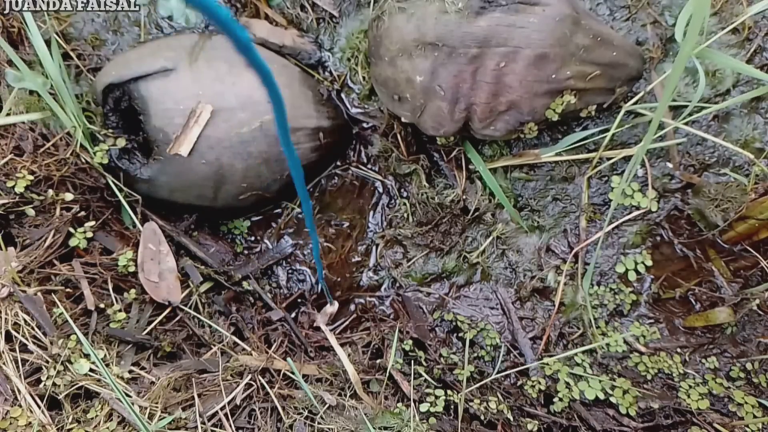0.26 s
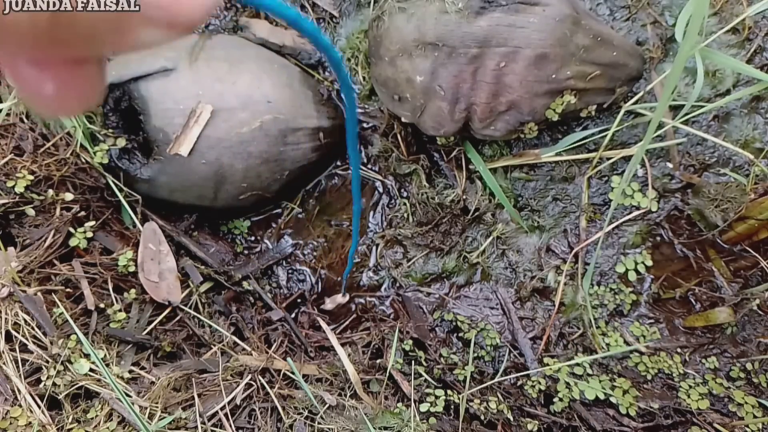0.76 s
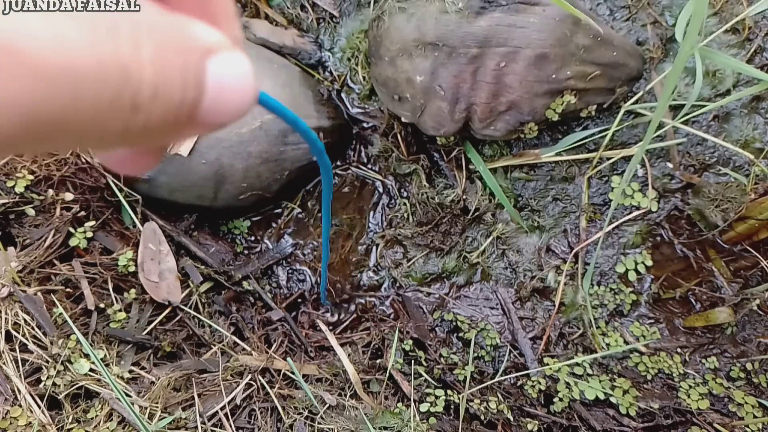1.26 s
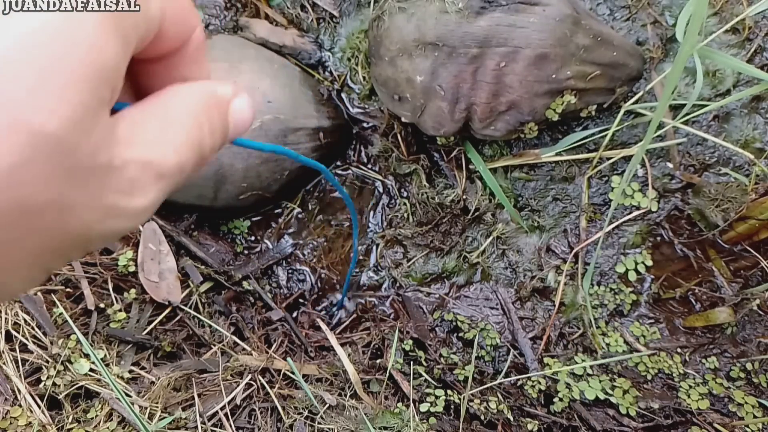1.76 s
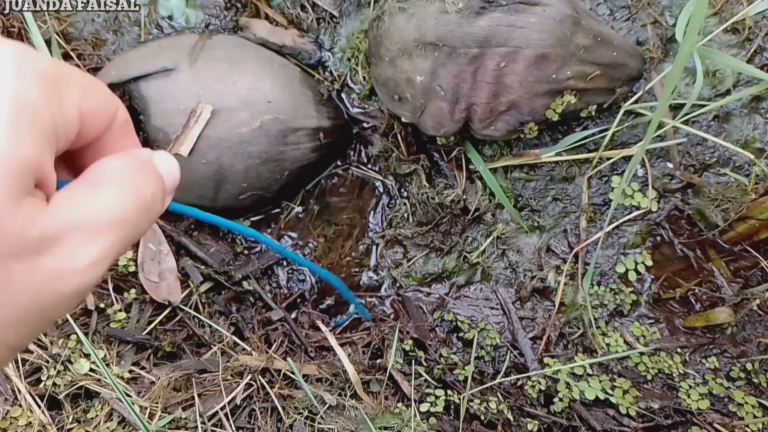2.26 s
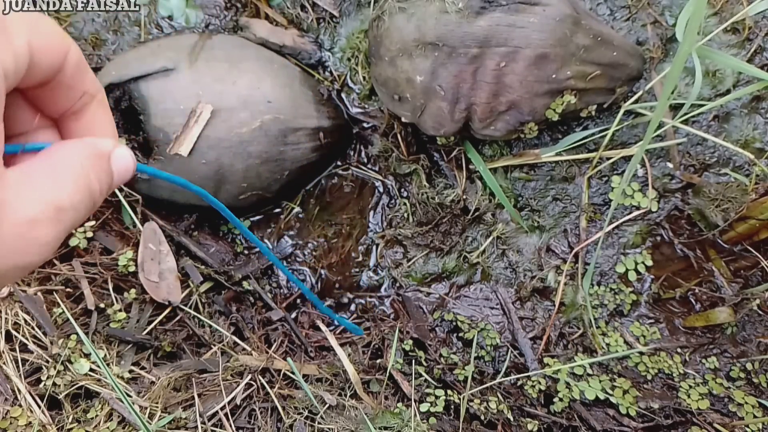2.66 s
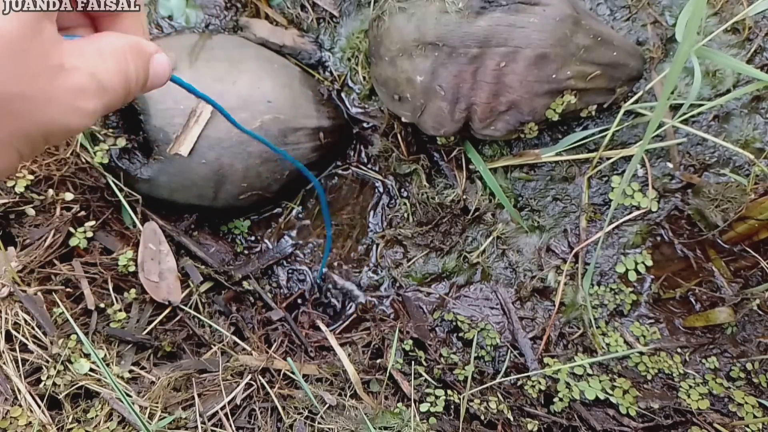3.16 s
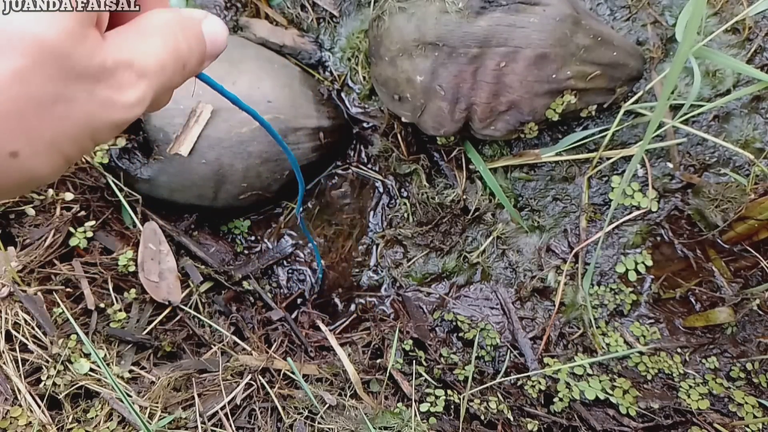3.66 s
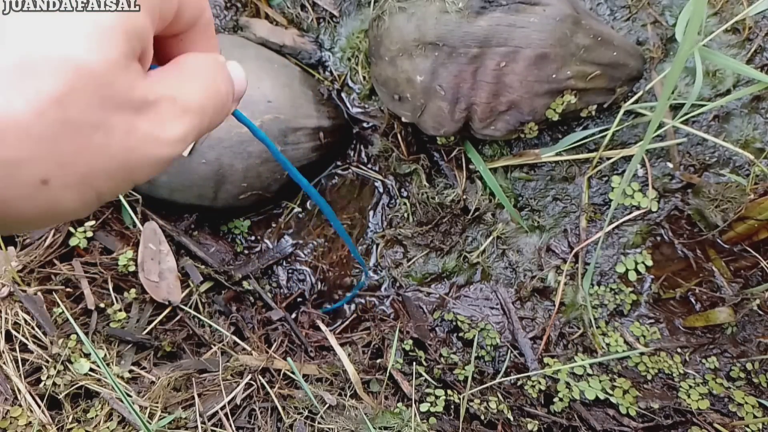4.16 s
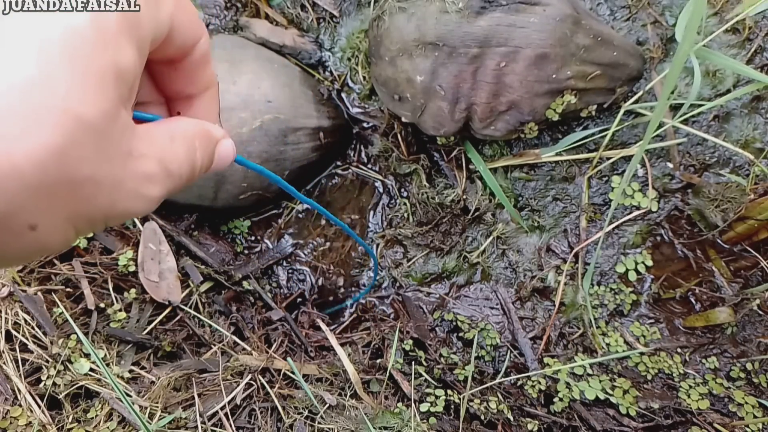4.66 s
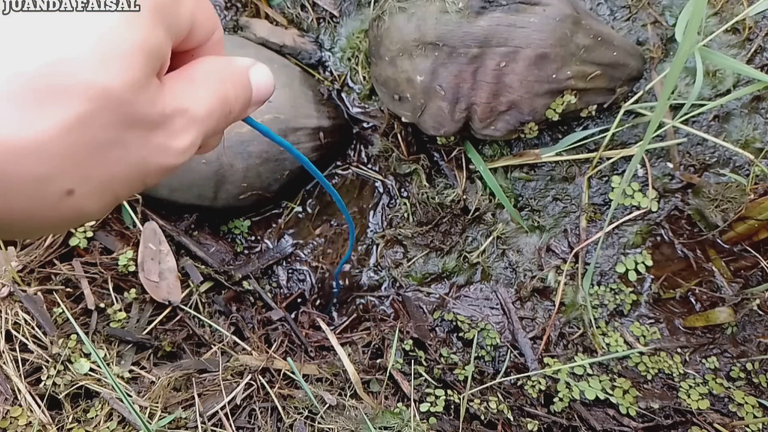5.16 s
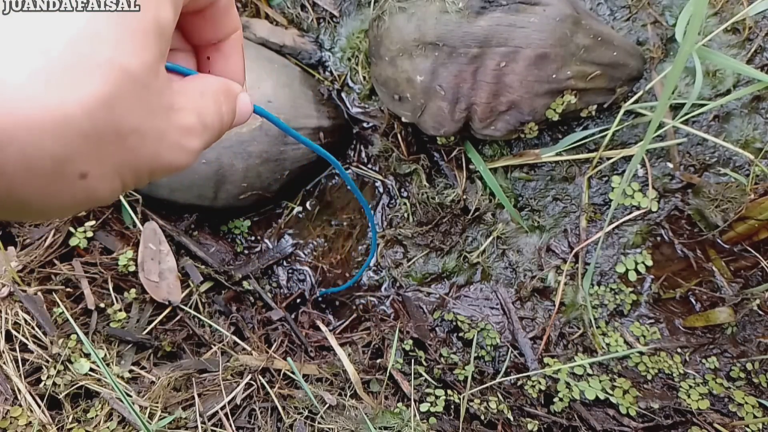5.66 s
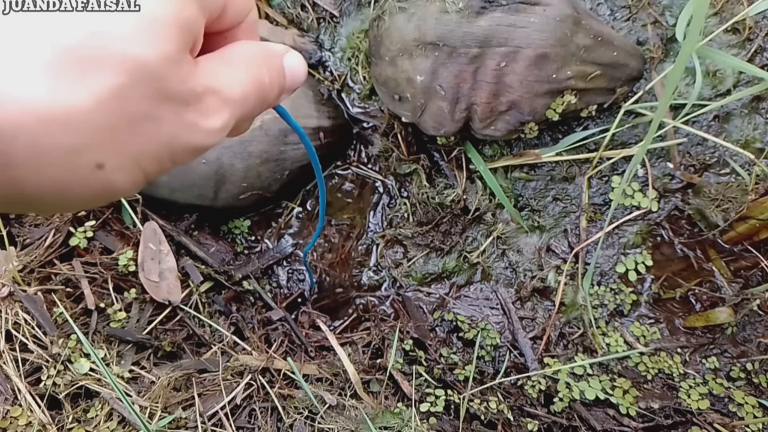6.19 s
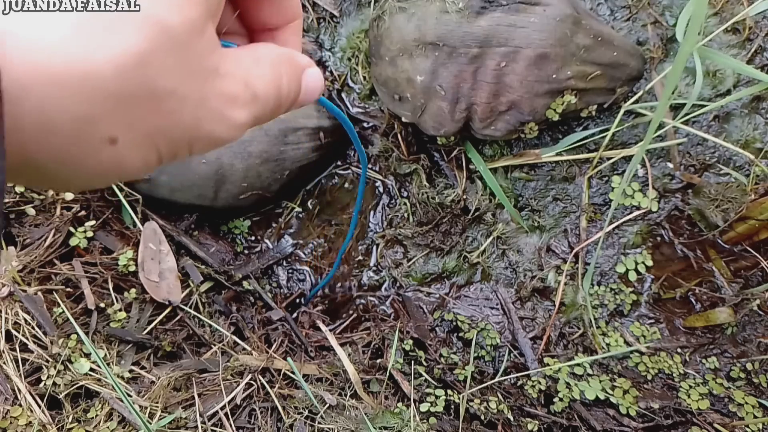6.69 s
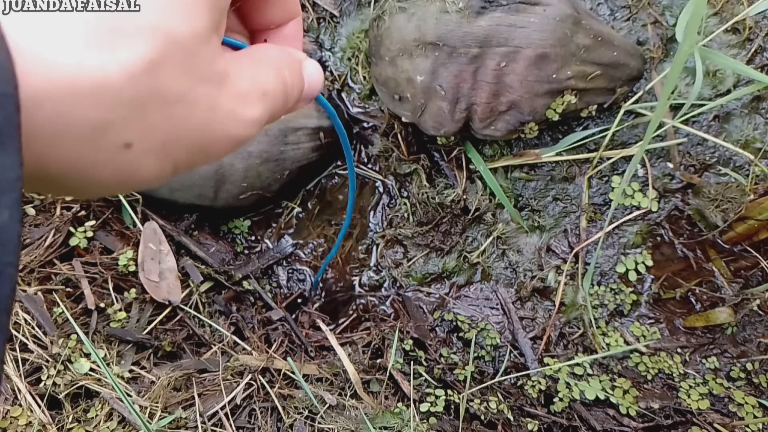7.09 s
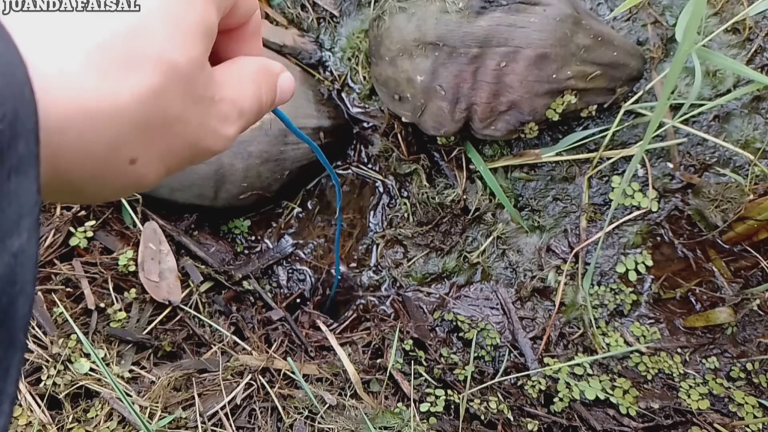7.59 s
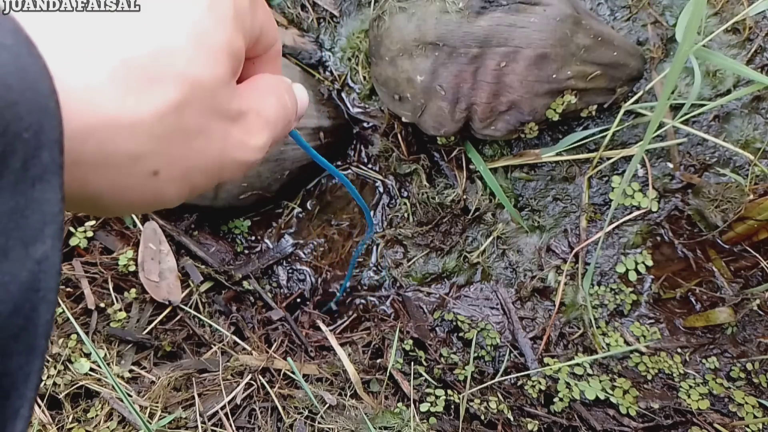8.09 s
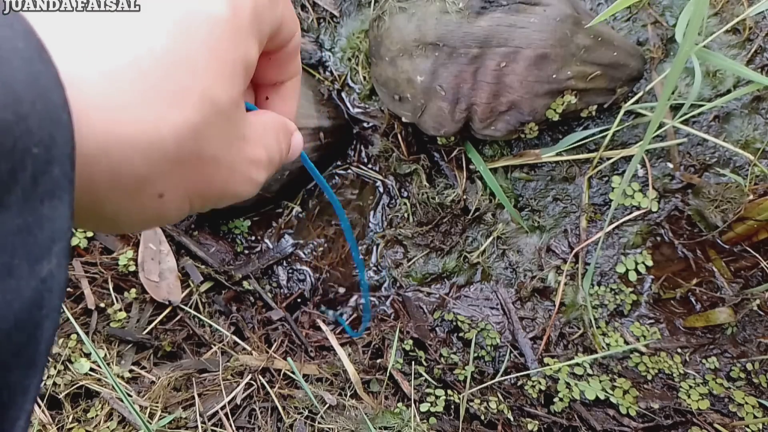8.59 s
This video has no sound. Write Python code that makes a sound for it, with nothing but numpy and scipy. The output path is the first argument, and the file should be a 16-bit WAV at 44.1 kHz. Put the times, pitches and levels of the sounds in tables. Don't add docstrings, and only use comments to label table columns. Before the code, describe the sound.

Damp open ground outdoors, heard close through a phone with no room echo. Running water makes an even, soft hiss with tiny splashes and rising bubble blips, most frequent in the first third. Over it lies a thin, shrill trill of two crickets, chirping about ten times a second with slight blur from the grass. Dry stems crackle briefly, faint air gusts rumble low, and a few soft deep thumps occur, strongest just before the middle and again at about three quarters.

```python
import sys
import numpy as np
from scipy import signal
from scipy.fft import rfft, irfft, next_fast_len
from scipy.io import wavfile
from scipy.ndimage import uniform_filter1d

SR = 44100
rng = np.random.default_rng(int(sys.argv[2]) if len(sys.argv) > 2 else 0)


def gain_from_db(level_db):
    decades = np.asarray(level_db, float) / 20
    return 10 ** decades


def put_to_file(sound):
    columns = np.atleast_2d(sound).T
    safe = np.clip(columns, -1, 1)
    whole_steps = np.round(safe * 32767)
    wavfile.write(sys.argv[1], SR, whole_steps.astype(np.int16))


N = 389844


def evened(x):
    return x / np.sqrt(np.mean(x ** 2) + 1e-20)


def curve(rows, column):
    rows = np.array(rows)
    return np.interp(np.arange(N) / SR, rows[:, 0], rows[:, column])


def swells(rows):
    t = np.arange(N) / SR
    return sum(rise_db * np.exp(-((t - at_s) / half_s) ** 2) for at_s, rise_db, half_s in rows)


def coloured(x, points):
    point_hz, point_db = np.transpose(points)
    size = next_fast_len(N)
    hz = np.fft.rfftfreq(size, 1 / SR)
    gain_db = np.interp(np.log(hz + 1), np.log(point_hz + 1), point_db, -90, -90)
    return evened(irfft(rfft(x, size) * gain_from_db(gain_db), size)[:N])


def hiss(points):
    return coloured(rng.standard_normal(N), points)


def wander(seconds):
    size = max(round(seconds * SR), 1)
    once = uniform_filter1d(rng.standard_normal(N), size)
    return evened(uniform_filter1d(once, size))


def add(mix, at_s, sound):
    part = mix[max(round(at_s * SR), 0):][:len(sound)]
    part += sound[:len(part)]


def chirps_of(songs, effort, rest_s):
    mood_s, mood_db, mood_hz = .002, .7, 12
    rows = []
    effort_s, effort_db, effort_hz = np.transpose(effort)
    for mark_s, chirps in map(np.transpose, songs):
        first_chirp = np.cumsum(chirps) - chirps
        starts = np.interp(np.arange(chirps.sum() + 1), first_chirp, mark_s)
        period = np.diff(starts, append=2 * starts[-1] - starts[-2])
        mood = rng.standard_normal((len(starts), 3))
        length = period - rest_s + mood_s * mood[:, 0]
        db = np.interp(starts, effort_s, effort_db) + mood_db * mood[:, 1]
        hz = np.interp(starts, effort_s, effort_hz) + mood_hz * mood[:, 2]
        rows += zip(starts, length, db, hz)
    return rows


def chirp(at_s, length_s, db, hz, per_s, first_s, last_s, fall_hz, swell_db):
    luck = rng.standard_normal((40, 3))
    per_s = per_s * (1 + .012 * luck[-1, 0])
    t = np.arange(0, length_s + 1 / per_s, 1 / SR)
    stroke = (t * per_s).astype(int)
    done = np.clip(stroke / per_s / length_s, 0, 1)
    left_s = (stroke + 1) / per_s - t
    span_s = first_s + (last_s - first_s) * done
    shape = np.sin(np.pi * np.clip(left_s / span_s, 0, 1)) ** 1.3
    end_hz = hz - fall_hz / 2 + 15 * luck[stroke, 0]
    turns = end_hz * left_s + fall_hz * left_s ** 2 / (2 * first_s)
    strength_db = db - swell_db * (1 - np.minimum(done / .35, 1)) + 1.0 * luck[stroke, 1]
    ending = np.clip((length_s - stroke / per_s) * per_s + .5, 0, 1)
    wave = np.sin(2 * np.pi * turns + 0.8 * luck[stroke, 2] + 2 * luck[-1, 2] * stroke)
    return at_s + first_s / 2 - 1 / per_s, 2 * gain_from_db(strength_db) * ending * shape * wave


# (first wing stroke [s], chirps to next mark [count])
LOW_SONGS = [
    [(0.062, 9), (0.938, 11), (2.031, 4), (2.451, 5), (2.98, 4), (3.41, 7), (4.125, 4), (4.532, 5),
     (5.067, 8), (5.926, 9), (6.899, 0)],
    [(7.01, 3), (7.29, 6), (7.866, 5), (8.345, 2), (8.55, 3), (8.835, 0)],
]
# (time [s], level [dB], wing pitch [Hz])
LOW_SINGER_EFFORT = [(0.06, -41.5, 9170), (0.45, -46.5, 9100), (0.94, -42, 9230), (2.03, -40, 9340),
                     (2.45, -42.5, 9330), (3.0, -44.5, 9300), (3.41, -43.5, 9100), (4.1, -41.5, 9150),
                     (5.07, -42.5, 9130), (5.93, -43.5, 9120), (6.75, -41.5, 9210), (7.1, -48, 9100),
                     (7.87, -45, 9120), (8.35, -44.5, 9160), (8.84, -47, 9100)]


def low_cricket():
    song = np.zeros(N)
    for row in chirps_of(LOW_SONGS, LOW_SINGER_EFFORT, rest_s=.024):
        add(song, *chirp(*row, per_s=141.5, first_s=.005, last_s=0.0072, fall_hz=730, swell_db=1.8))
    return song


# (first wing stroke [s], chirps to next mark [count])
HIGH_SONGS = [
    [(0.03, 1), (0.139, 0)],
    [(2.35, 10), (3.42, 6), (4.07, 6), (4.742, 5), (5.285, 2), (5.51, 2), (5.76, 0)],
    [(5.93, 9), (6.9, 0)],
    [(7.39, 5), (7.872, 1), (8.0, 2), (8.24, 4), (8.65, 1), (8.775, 0)],
]
# (time [s], level [dB], wing pitch [Hz])
HIGH_SINGER_EFFORT = [(0.03, -45, 9700), (0.14, -39.5, 9740), (2.35, -48.5, 9700), (3.4, -42, 9500),
                      (3.65, -39, 9650), (4.74, -37.5, 9610), (5.3, -38.5, 9670), (5.8, -38.5, 9620),
                      (5.89, -44, 9680), (6.9, -48, 9650), (7.39, -51, 9700), (7.87, -45, 9500),
                      (8.24, -44, 9700), (8.8, -45, 9640)]


def high_cricket():
    song = np.zeros(N)
    for row in chirps_of(HIGH_SONGS, HIGH_SINGER_EFFORT, rest_s=.03):
        add(song, *chirp(*row, per_s=133, first_s=.0054, last_s=0.0068, fall_hz=420, swell_db=3.3))
    return song


def crickets():
    song = low_cricket() + high_cricket()
    t = np.arange(6000) / SR
    blur = rng.standard_normal((2, 6000)) * gain_from_db(-60 * t / .06)
    blur = blur / np.linalg.norm(blur[0])
    echoes = signal.oaconvolve(song[None], blur, axes=1)[:, :N]
    turn = 3.55 * wander(0.082)
    scattered = gain_from_db(-12) * (np.cos(turn) * echoes[0] + np.sin(turn) * echoes[1])
    far_chorus = gain_from_db(-49.5) * hiss([(8300, -13), (9000, 0.5), (9600, 0), (10400, -13)])
    return song * gain_from_db(1.0 * wander(.0015)) + scattered + far_chorus


# (frequency [Hz], level [dB per Hz])
SPLASH_SPECTRUM = [(500, 1.5), (1000, -8), (1700, 4), (2600, 6.5), (3600, 9), (5000, 3.5), (7000, -0.5)]


def splashes():
    grains = np.zeros(N)
    t = np.arange(1200) / SR
    clumps = gain_from_db(3 * wander(.025))
    for hz in np.geomspace(700, 6000, num=16):
        falls = rng.random(N) < 90 * clumps / SR
        drops = falls * gain_from_db(2.43 * np.minimum(rng.exponential(1, N), 5))
        ring = np.sin(2 * np.pi * hz * t * (1 + 8 * t)) * np.exp(-t * hz / 5) * (1 - np.exp(-t * hz))
        grains += signal.oaconvolve(drops, evened(ring) / np.sqrt(hz))[:N]
    return coloured(grains, SPLASH_SPECTRUM)


# (time [s], flow level [dB], splash share [0-1], fine spray re flow [dB])
WATER_FLOW = [(0.11, -39, 0.1, -20.5), (0.98, -37.5, 0.23, -21), (1.01, -39, 0.16, -20),
              (1.37, -38, 0.06, -19), (3.25, -37.5, 0.38, -20), (3.44, -39, 0.13, -19),
              (5.77, -38.5, 0.13, -20), (5.8, -37.5, 0.35, -22.5), (6.8, -38, .3, -20),
              (8.84, -39.5, 0.19, -21)]
# (frequency [Hz], level [dB per Hz])
WASH_SPECTRUM = [(110, -67), (180, -13), (273, -1.5), (353, -1), (435, -3.5), (1080, -4.5), (1380, -3),
                 (2380, -2), (3380, -2.5), (4300, -5.5), (7420, -19.5), (8300, -18.5), (10800, -24.5),
                 (18300, -120)]
# (frequency [Hz], level [dB per Hz])
FIZZ_SPECTRUM = [(6060, -38), (10300, 0.5), (12400, -9), (13700, -8.5), (14900, -4.5), (15400, -4)]
# (time [s], rise [dB], half length [s])
SPRAY_SPURTS = [
    (0.94, 12, .015),
    (1.78, 3, .1),
    (2.985, 6, .025),
    (3.21, 3, .05),
    (6.98, 4, .05),
]


def water():
    wash = hiss(WASH_SPECTRUM) * gain_from_db(.5 * wander(0.029))
    share = np.clip(curve(WATER_FLOW, 2), 0, 1)
    body = 1.197 * np.sqrt(1 - share) * wash + np.sqrt(share) * splashes()
    fizz = hiss(FIZZ_SPECTRUM) * gain_from_db(1.0 * wander(0.007))
    fizz_db = curve(WATER_FLOW, 3) + swells(SPRAY_SPURTS)
    return gain_from_db(curve(WATER_FLOW, 1)) * (body + gain_from_db(fizz_db) * fizz)


# (time [s], still air level [dB])
STILL_AIR = [(0.11, -57), (1.6, -61.5), (2.3, -61.5), (3.5, -59.5), (5.5, -61.5), (8.84, -61.5)]
# (time [s], rise [dB], half length [s])
AIR_GUSTS = [(0.31, 4, .06), (0.66, 0, .1), (0.97, 7, 0.11), (2.66, 6, 0.2), (3.12, 7, 0.11),
             (3.4, 5, 0.13), (4.47, 9, .08), (6.62, 5, 0.18), (7.27, 3, .1), (7.83, 2, .1), (8.74, 3, .1)]
# (frequency [Hz], level [dB per Hz])
RUMBLE_SPECTRUM = [(12, -43), (20, -22), (48, 0), (98, 2.5), (141, -2.5), (161, -30), (170, -26),
                   (220, -41), (370, -120)]


def rumble():
    level_db = curve(STILL_AIR, 1) + swells(AIR_GUSTS)
    return gain_from_db(level_db) * hiss(RUMBLE_SPECTRUM) * gain_from_db(0.62 * wander(0.02))


# (time [s], peak above 11 kHz [dB], t60 [s])
GRASS_RUSTLES = [(0.2546, -54, 0.093), (0.941, -41, 0.08), (1.3087, -41, 0.094), (1.4165, -48, 0.08),
                 (1.5496, -42, 0.08), (1.7367, -53, 0.08), (2.1528, -51, 0.08), (2.4805, -48, 0.08),
                 (2.9649, -46, 0.088), (6.9713, -39.5, 0.08), (7.558, -44, 0.11), (8.4659, -48, 0.08)]


def rustles():
    size = np.zeros(N)
    t = np.arange(6000) / SR
    for at_s, db, t60_s in GRASS_RUSTLES:
        add(size, at_s, gain_from_db(db - 11 - 60 * t / max(t60_s, .06)) * (1 - np.exp(-t / .005)))
    crackle = rng.standard_normal(N) * gain_from_db(2.5 * wander(.001))
    return size * coloured(crackle, [(2000, -12), (5000, -9), (9000, 15), (12000, -3), (16000, 0)])


# (time [s], peak [dB], pitch [Hz])
BUBBLES = [(0.7744, -14, 2110), (0.9762, -9.5, 3660), (1.2448, -16, 1660), (1.2778, -14, 2300),
           (1.3351, -11, 3380), (1.6847, -18, 2120), (1.7185, -19, 2950), (2.0707, -18, 3030),
           (2.1694, -14, 3540), (2.2912, -12, 3010), (2.3256, -16, 3590), (2.4795, -12, 2430),
           (2.5878, -12, 2600), (2.9594, -11, 2840), (3.1061, -13.5, 1640), (3.2069, -11, 2660),
           (5.08, -17, 2650), (6.0352, -12, 1770), (6.8955, -23, 2420), (7.0053, -14, 2390),
           (7.0591, -15, 1460), (7.2382, -13, 2530), (7.5186, -11, 2200), (7.6774, -15, 4340),
           (8.3677, -18, 1770), (8.7054, -15, 3630)]


def plops():
    out = np.zeros(N)
    t = np.arange(1500) / SR
    for at_s, db, hz in BUBBLES:
        tone = np.sin(2 * np.pi * hz * t * (1 + 5 * t))
        add(out, at_s, gain_from_db(db - 11 - 60 * t / 0.017) * tone * (1 - np.exp(-t / 0.00087)))
    return out


# (time [s], peak [dB])
NEAR_DROPS = [(0.9394, -26), (1.2447, -26), (1.277, -27), (1.3354, -25), (1.6841, -26), (1.7194, -25.5),
              (3.2078, -26), (6.034, -21.5), (6.16, -26), (6.895, -30), (7.006, -24)]


def splats():
    size = np.zeros(N)
    t = np.arange(1000) / SR
    for at_s, db in NEAR_DROPS:
        add(size, at_s, gain_from_db(db - 5 - 60 * t / 0.048) * (1 - np.exp(-t / 0.0012)))
    return size * hiss([(700, -17), (1500, -3), (3800, 0), (6000, -13), (9000, -24)])


# (time [s], peak [dB], pitch [Hz], half length [s], upper knock re peak [dB])
BODY_KNOCKS = [(1.027, -51, 68, 0.032, -30), (2.986, -42, 72, 0.032, -30), (3.638, -37, 75.4, 0.0062, -18),
               (4.399, -36, 80, 0.0082, -30), (4.42, -24, 86.5, 0.011, -16), (4.474, -43, 90, 0.0078, -30),
               (4.555, -43, 76.4, .02, -30), (6.496, -28.5, 84, 0.0068, -7), (6.53, -37, 75, 0.007, -22),
               (6.549, -45, 85, .007, -20), (6.605, -44, 75, .01, -25), (6.568, -39, 80, 0.012, -4),
               (6.722, -48, 83, 0.028, -30)]


def knocks():
    out = np.zeros(N)
    for at_s, db, hz, half_s, upper_db in BODY_KNOCKS:
        t = np.arange(-3 * half_s, 3 * half_s, 1 / SR)
        swing = np.cos(2 * np.pi * hz * t * (1 - 6 * t))
        body = np.exp(-(t / half_s) ** 2) * swing
        case = np.exp(-(t / .007) ** 2) * np.sin(2 * np.pi * 270 * t)
        add(out, at_s - 3 * half_s, gain_from_db(db) * (body + gain_from_db(upper_db) * case))
    return out


def scene():
    mix = crickets() + water() + rumble() + rustles() + plops() + splats() + knocks()
    return mix[None]


def band_limit(x):
    return signal.sosfilt(signal.butter(12, 16650, fs=SR, output="sos"), x)


def record(dry):
    start_s, edge_hz = .1078, 15560
    song_low_hz, song_high_hz = 8700, 10300
    hidden_hz, hidden_width_hz = 12400, 1200
    edge = signal.firwin(801, edge_hz, window=("kaiser", 9), fs=SR)
    limited = signal.oaconvolve(dry, edge[None], "same")[0]
    hz, _, cells = signal.stft(limited, SR, nperseg=2048)
    power = uniform_filter1d(abs(cells) ** 2, size=6, axis=0)
    song = uniform_filter1d(power[(hz > song_low_hz) & (hz < song_high_hz)].mean(0), size=2)
    reach_db = -25.8 - 3.0 * ((hz[:, None] - hidden_hz) / hidden_width_hz) ** 2
    kept = (power > song * gain_from_db(2 * reach_db)) | (hz[:, None] < song_high_hz)
    gated = signal.istft(cells * kept, SR, nperseg=2048)[1][None, :N]
    return band_limit(gated * (np.arange(N) >= start_s * SR))


dry = scene()
out = record(dry)
put_to_file(out)
```